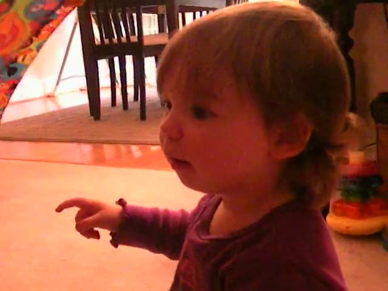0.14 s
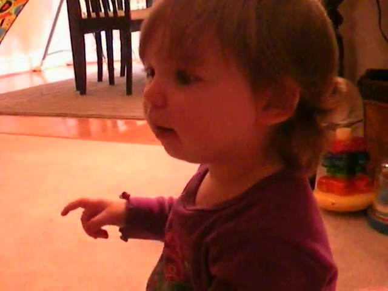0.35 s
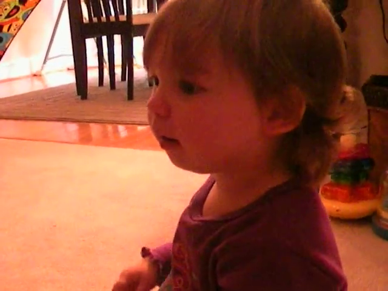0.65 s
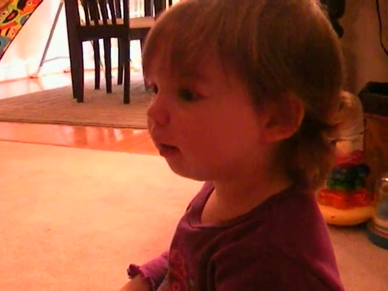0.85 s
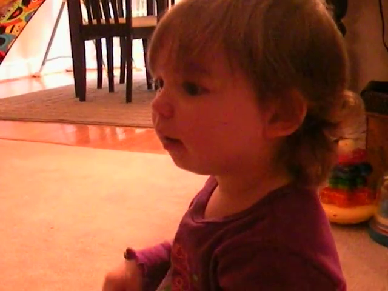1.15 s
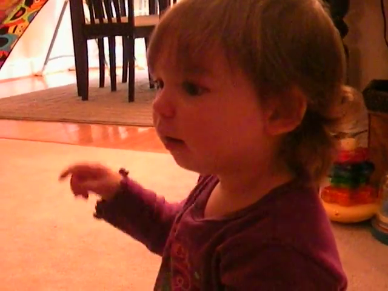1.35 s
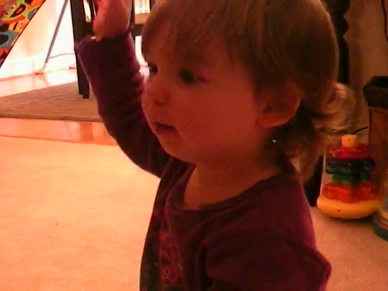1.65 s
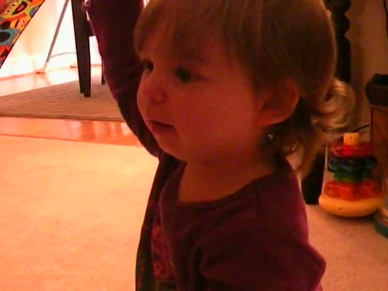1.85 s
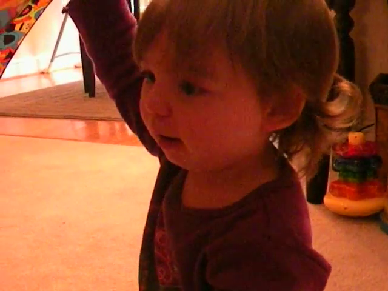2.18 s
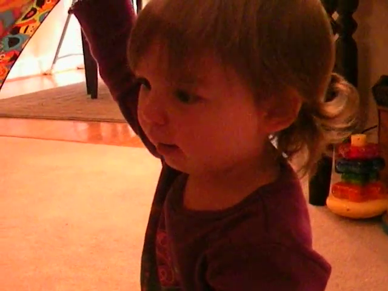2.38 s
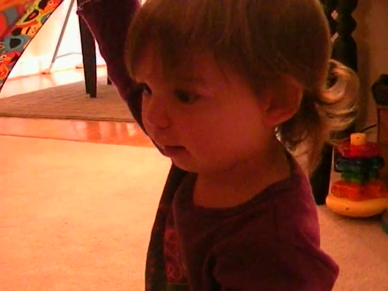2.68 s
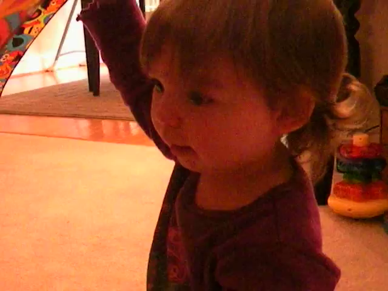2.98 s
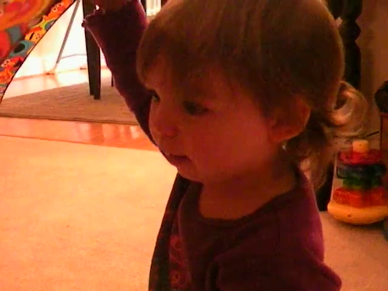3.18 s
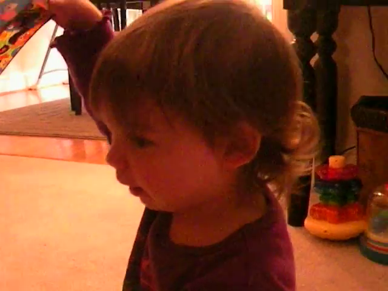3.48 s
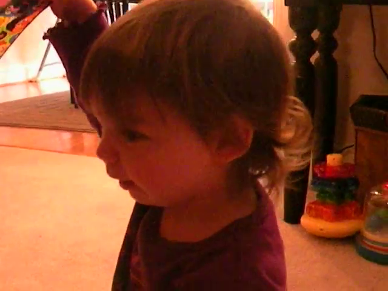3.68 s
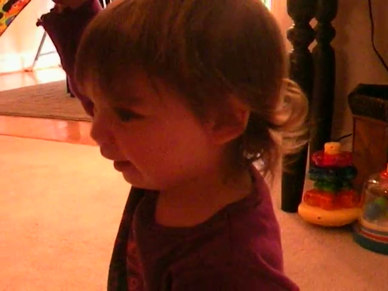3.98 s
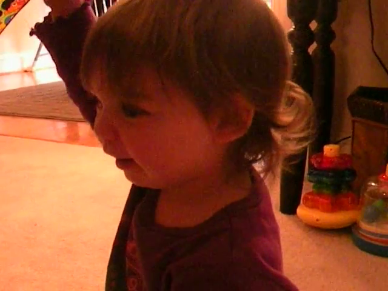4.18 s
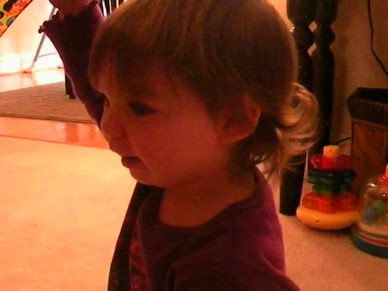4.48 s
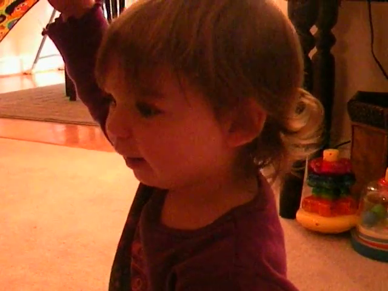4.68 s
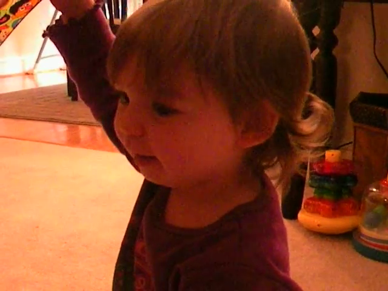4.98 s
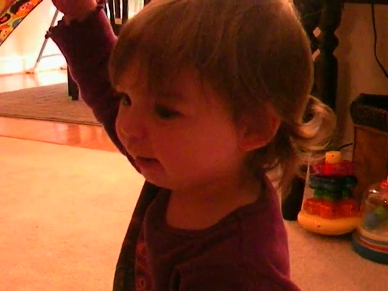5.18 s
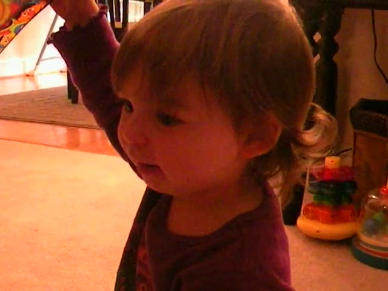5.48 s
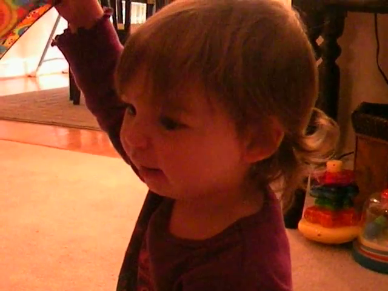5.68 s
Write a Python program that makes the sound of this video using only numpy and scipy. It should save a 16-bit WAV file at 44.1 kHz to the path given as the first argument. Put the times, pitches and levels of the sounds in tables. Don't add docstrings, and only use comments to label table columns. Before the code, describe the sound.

Quiet indoor hum and hiss, sparse fabric swipes and light carpeted taps, followed by continuous squeaky rubbing of synthetic cloth on the left.

```python
import sys
import numpy as np
from scipy import signal
from scipy.fft import rfft, irfft, next_fast_len
from scipy.io import wavfile
from scipy.ndimage import uniform_filter1d, map_coordinates

SR = 44100
rng = np.random.default_rng(int(sys.argv[2]) if len(sys.argv) > 2 else 0)


def rack_gain(trim_db):
    fader = np.asarray(trim_db, float)
    return 10 ** (fader / 20)


def unload_audio(sound):
    columns = np.transpose(np.atleast_2d(sound))
    steps = np.round(np.clip(columns, -1, 1) * 32767)
    wavfile.write(sys.argv[1], SR, steps.astype(np.int16))


N = 257544

# (frequency [Hz], density [dB/Hz])
HUM_SPECTRUM = [(13, -69), (22, -35), (38, -23), (53, -44), (57, -15), (68, -17.5), (118, -1), (130, -4.5),
                (145, -10.5), (247, -4.5), (328, -14.5), (345, -47), (420, -20), (550, -64), (920, -120)]
HISS_SPECTRUM = [(190, -21), (330, 0.5), (348, -6.5), (827, -2.5), (1080, -3.5), (1750, -3), (1970, -4),
                 (5330, -12), (7600, -21), (9880, -40), (16700, -120)]
FIZZ_SPECTRUM = [(8000, -120), (8200, -7.5), (9000, 0.5), (10000, 3), (11500, 2), (12700, 1.5),
                 (13800, -3.5), (14000, -120)]
# (frequency [Hz], correlation [-1..1])
HUM_LIKENESS = [(40, 0.5), (80, 0.92), (170, 0.11), (330, -0.85)]
# (frequency [Hz], t60 [s])
ROOM_T60 = [(200, 0.76), (2000, 0.37), (6000, 0.22), (12000, 0.058)]
# (frequency [Hz], density [dB/Hz])
AUDIBLE_FLOOR = [(6600, -140), (7000, -117), (7600, -114), (8400, -112), (9300, -112), (10500, -111),
                 (10800, -108.5), (12700, -108), (13000, -103)]

# (time [s], tick level [dB], tick cut-off [Hz], thud level [dB])
KNOCKS = [
    (2.034, -31, 5900, -36),
    (2.041, -26.5, 6850, -29),
    (2.048, -26, 3500, -57),
    (2.086, -60, 3000, -36),
    (3.374, -30, 3000, -41),
    (3.381, -21.5, 1500, -42),
    (3.406, -54, 1500, -39),
    (4.709, -42, 6000, -52),
]
# (frequency [Hz], level [dB], t60 [s])
BOARD_MODES = [(90, -9.5, 0.18), (165.3, -2, 0.35), (211, 2.5, 0.09), (271.5, -10.5, 0.19),
               (775, -4, 0.054)]
# (peak time [s], level [dB])
WEIGHT_SHIFTS = [
    (2.06, -38),
    (2.72, -47.5),
    (3.41, -47),
    (4.1, -45.5),
    (4.47, -46.5),
    (4.74, -40.5),
    (5.21, -46.5),
    (5.75, -45.5),
]
# (frequency [Hz], density [dB/Hz])
CREAK_SPECTRUM = [(90, -64), (140, 2), (200, -6.5), (260, 0), (320, -10.5), (350, -29), (500, -78)]

# (start [s], length [s], first pitch [Hz], last pitch [Hz], level [dB])
SQUEAKS = [(4.004, .04, 1760, 2090, -44.5), (4.034, 0.023, 1766, 1740, -44.5),
           (4.052, 0.019, 1636, 1380, -52), (4.1, 0.015, 2310, 5050, -27), (4.104, 0.0025, 3950, 4150, -16),
           (4.234, 0.041, 1824, 1976, -40.5), (4.275, 0.017, 1965, 1940, -45),
           (4.501, 0.025, 2035, 2290, -39), (4.505, 0.041, 1790, 1757, -39.5),
           (4.541, 0.04, 2260, 2090, -38.5), (4.721, 0.026, 2540, 2456, -29),
           (4.741, 0.07, 1420, 880, -47.5), (4.805, 0.02, 2370, 2420, -39.5),
           (5.069, 0.035, 1810, 2020, -36.5), (5.105, .0084, 2400, 2490, -43),
           (5.212, 0.011, 2310, 2410, -41), (5.304, 0.043, 1602, 897, -43), (5.337, 0.047, 1720, 2290, -41),
           (5.543, 0.058, 1167, 1800, -46.5), (5.576, .026, 1954, 1605, -38),
           (5.608, .026, 2030, 2320, -35.5), (5.63, .02, 2130, 1740, -42), (5.816, 0.026, 1994, 2350, -38),
           (5.818, 0.024, 1845, 1910, -36)]

# (fastest time [s], level [dB], speed-up [s], slow-down [s], palm contact [dB])
STROKES = [(4.02, -44, 0.039, 0.039, -2), (4.115, -44, 0.042, 0.046, 0), (4.24, -42.5, 0.053, 0.13, -8),
           (4.369, -38.5, 0.028, 0.028, -8), (4.485, -40.5, 0.037, 0.076, -5.5),
           (4.622, -41, 0.05, 0.045, -12), (4.765, -50, 0.042, 0.029, 1), (4.906, -41.5, 0.058, 0.031, -18),
           (5.02, -44.5, 0.019, 0.019, -1), (5.09, -44.5, 0.019, 0.038, -2), (5.162, -38, .04, 0.06, -17),
           (5.295, -39, .035, 0.029, -12), (5.435, -41.5, 0.099, 0.037, -8.5),
           (5.567, -38, .04, 0.067, -4.5), (5.71, -37, 0.046, 0.039, -10.5), (5.81, -37, 0.02, 0.045, -3.5)]
# (time [s], level [dB])
PRESSURE = [
    (3.9, -69),
    (4.082, -52),
    (4.714, -48.5),
    (4.732, -42.5),
    (4.85, -50.5),
    (5.31, -49),
    (5.802, -49.5),
    (5.84, -58),
]
# (time [s], drop [dB])
LIFTS = [
    (4.432, 0.5),
    (4.965, 8.5),
    (5.5, 3.5),
    (5.776, 2),
]
# (frequency [Hz], density [dB/Hz])
CLOTH_SPECTRUM = [(1880, -45), (3200, -3), (5810, -0.5), (6950, -5.5), (7400, -14.5), (9620, -13),
                  (16300, -120)]
PALM_SPECTRUM = [(1000, -19.5), (1600, -14), (2200, -6), (3000, -3), (4200, -15), (8000, -90)]
DULL_SPECTRUM = [(240, -26), (400, -18.5), (771, -7), (877, -3), (1470, -5.5), (1990, -3), (2200, -11),
                 (2860, -29), (4840, -120)]
POCKET_SPECTRUM = [(700, -53), (840, 1.5), (900, 10), (980, -8), (1150, -45)]
SHEEN_SPECTRUM = [(4820, -86), (8200, 1), (8680, -11), (9240, -3), (11000, -0.5), (13000, -4), (13800, -12)]

# (peak time [s], level [dB], fade [s], fold resonance [Hz])
SWIPES = [(.1, -58.5, 0.11, 2960), (1.131, -67, 0.075, 1800), (1.76, -64, 0.053, 1490),
          (2.063, -48, 0.021, 2960), (2.075, -28.5, 0.0029, 4900), (2.086, -24.5, 0.0094, 2820),
          (2.106, -34, 0.012, 2500), (2.365, -52.5, 0.032, 2120), (2.445, -39, 0.018, 4340),
          (2.626, -61, 0.02, 2000), (2.69, -41, 0.014, 870), (2.711, -23, 0.013, 4350),
          (2.78, -48, 0.034, 2470), (2.948, -55.5, 0.043, 2640), (3.141, -54, 0.04, 5630),
          (3.168, -40.5, 0.013, 6440), (3.23, -38.5, 0.013, 6440), (3.333, -50, 0.037, 2760),
          (3.43, -50, 0.03, 2480), (3.501, -56.5, 0.083, 2000), (3.598, -44, 0.0086, 4870),
          (3.611, -40.5, 0.023, 3950), (4.106, -33.5, 0.013, 4700), (4.728, -25, 0.0088, 2540),
          (4.759, -37.5, 0.013, 3500), (4.815, -52, .01, 2500), (5.208, -36, 0.014, 1900),
          (5.83, -42, 0.031, 2200)]
# (frequency [Hz], density [dB/Hz])
FABRIC_SPECTRUM = [(180, -49), (300, -19.5), (1000, -7), (1160, -3), (3730, -2.5), (4100, -6), (5020, 0.5),
                   (7400, -14.5), (9620, -51), (16300, -120)]


def unit(x):
    return x / np.sqrt(np.mean(x ** 2) + 1e-20)


def along(points, hz):
    f, v = np.transpose(points)
    return np.interp(np.log(hz + 1), np.log(f + 1), v)


def filtered(x, response):
    n = x.shape[-1]
    m = next_fast_len(n + 4096)
    return irfft(rfft(x, m) * response(np.fft.rfftfreq(m, 1 / SR)), m)[..., :n]


def wobble(rate_hz, size):
    knots = rng.standard_normal(int(size * rate_hz / SR) + 4)
    return map_coordinates(knots, [np.arange(size) * rate_hz / SR])


def rush(spectrum, alike, grain_db, size, lag_s=0.):
    pair = rng.standard_normal((2, size)) * rack_gain(grain_db * wobble(900, size))

    def mid_side(hz):
        turn = np.arccos(np.clip(along(alike, hz), -1, 1)) / 2
        return rack_gain(along(spectrum, hz)) * [np.cos(turn), np.sin(turn)]

    mid, side = filtered(pair, mid_side)
    left_right = np.array([mid + side, mid - side])
    return unit(filtered(left_right, lambda hz: np.exp(-2j * np.pi * hz * [[0], [lag_s]])))


def patchy(x, depth_db):
    z = signal.stft(x, nperseg=256)[2]
    field = uniform_filter1d(rng.standard_normal(z.shape[1:]), size=4, axis=0)
    field = uniform_filter1d(field, size=8, axis=1)
    return signal.istft(z * rack_gain(depth_db * unit(field)), nperseg=256)[1][:, :N]


def add(track, start_s, sound):
    part = track[..., max(round(start_s * SR), 0):][..., :sound.shape[-1]]
    part += sound[..., :part.shape[-1]]


def background():
    hum_db, hiss_db, fizz_db = -51 + 2.5, -57.5 + 5.0, -69.5
    swell_db = 0.8 * wobble(3, N)
    hum = rack_gain(hum_db + swell_db) * rush(HUM_SPECTRUM, HUM_LIKENESS, grain_db=0.5, size=N)
    drift_db = 0.3 * wobble(2.5, N)
    hiss = rush(HISS_SPECTRUM, [(500, -0.4), (4000, -0.54)], grain_db=-1.1, size=N)
    hiss = rack_gain(hiss_db + drift_db) * hiss
    fizz = rush(FIZZ_SPECTRUM, [(10000, -0.05)], grain_db=-2.5, size=N)
    return hum + hiss + rack_gain(fizz_db) * patchy(fizz, depth_db=3.5)


def room(x):
    out, step, predelay_s = np.zeros((2, N)), SR // 4, 0.008
    for start in range(0, N, step):
        hz, t, z = signal.stft(rng.standard_normal((2, SR // 2)), SR, nperseg=256)
        decay = rack_gain(-60 * t / along(ROOM_T60, hz)[:, None])
        tail = signal.istft(z * decay, SR, nperseg=256)[1]
        tail = tail / np.linalg.norm(tail[0])
        add(out, start / SR + predelay_s, signal.fftconvolve(x[None, start:start + step], tail, axes=1))
    return out


def weight_shifts():
    load_db_per_s, settle_db_per_s, standing_db = 264, 101, -57.5
    at_s, db = np.transpose(WEIGHT_SHIFTS)[:, :, None]
    since_s = np.arange(N) / SR - at_s
    slope = np.where(since_s < 0, -load_db_per_s, settle_db_per_s)
    shifting_db = (db - slope * since_s).max(0)
    weight_db = np.where(since_s[0] > 0, np.maximum(shifting_db, standing_db), shifting_db)
    return rack_gain(weight_db + 0.5) * rush(CREAK_SPECTRUM, [(200, 1.0)], grain_db=0, size=N)


def knocks():
    out, t = np.zeros(N), np.arange(SR // 2) / SR
    tick_t60_s, thud_rise_s = 0.016, 0.005
    for at_s, tick_db, tick_hz, thud_db in KNOCKS:
        crack = rng.standard_normal(len(t)) * rack_gain(-60 * t / tick_t60_s)
        tick = filtered(crack, lambda f: (1j * f / (600 + 1j * f)) ** 2 / (1 + 1j * f / tick_hz) ** 3)
        thud = np.zeros(len(t))
        for hz, db, t60_s in BOARD_MODES:
            thud += rack_gain(db + rng.normal(0, 1) - 60 * t / t60_s) * np.sin(2 * np.pi * hz * t)
        thud *= 1 - np.exp(-t / thud_rise_s)
        add(out, at_s, rack_gain(tick_db + 5) * tick + rack_gain(thud_db) * thud)
    return out


def squeaks():
    out = np.zeros(N)
    arch = 0.0573
    for start_s, length_s, first_hz, last_hz, db in SQUEAKS:
        u = np.linspace(-1.5, 1.5, round(1.5 * length_s * SR))
        hz = (last_hz - first_hz) * u / 2 + (last_hz + first_hz) / 2 * (1 + arch * (1 - u ** 2))
        hz = hz * (1 + 0.01 * wobble(200, len(u)))
        tone = rack_gain(1.3 * wobble(202, len(u))) * np.exp(-2.2 * u ** 2)
        halo = 0.3 * wobble(708, len(u)) * np.cos(np.pi * u / 3)
        whistle = (tone + halo) * np.sin(2 * np.pi * np.cumsum(hz) / SR)
        add(out, start_s - length_s / 4, rack_gain(db + 8.0) * whistle)
    return out


def rubbing():
    t = np.arange(N) / SR
    lift_s = 0.0097
    lift_db = sum(db * np.exp(-((t - at_s) / lift_s) ** 2) for at_s, db in LIFTS)
    pressure = rack_gain(np.interp(t, *np.transpose(PRESSURE), left=-120) - lift_db)
    at_s, db, up_s, down_s, palm_db = np.transpose(STROKES)[:, :, None]
    strokes = rack_gain(db) * np.exp(-((t - at_s) / np.where(t < at_s, up_s, down_s)) ** 2)
    drag = rack_gain(2.5) * pressure
    speed = np.sqrt((strokes ** 2).sum(0) + drag ** 2)
    contact = np.sqrt(((rack_gain(palm_db) * strokes) ** 2).sum(0) + (0.64 * drag) ** 2)

    faster_db = np.clip(20 * np.log10(speed) + 42, -20, 20)
    shade_db = np.array([[0.3], [-0.7]]) * (9 + 0.16 * faster_db)

    cloth = speed * rack_gain(2.0 + shade_db)
    cloth = cloth * rush(CLOTH_SPECTRUM, [(4000, 0.05)], grain_db=0.5, size=N, lag_s=7e-5)
    palm = contact * rack_gain(4.0 + 0.13 * shade_db)
    palm = palm * rush(PALM_SPECTRUM, [(2000, 0.53)], grain_db=0.5, size=N, lag_s=7e-5)
    dull = pressure * rack_gain(2.0 + 0.067 * faster_db + 0.12 * shade_db)
    dull = dull * rush(DULL_SPECTRUM, [(500, 0.6), (1400, 1.0)], grain_db=0.0, size=N, lag_s=6e-5)
    sheen = speed * rack_gain(3.5 - 0.033 * faster_db + 0.99 * shade_db)
    sheen = sheen * rush(SHEEN_SPECTRUM, [(10000, -0.53), (12000, -0.8)], grain_db=1.0, size=N)
    pocket = pressure * rack_gain(-10 + 1.8 * wobble(6, N))
    pocket = pocket * rush(POCKET_SPECTRUM, [(900, 0.9)], grain_db=0.5, size=N)
    grip_db = 0.7 * wobble(40, N)
    return rack_gain(grip_db) * (patchy(cloth + palm + dull, depth_db=2.0) + sheen + pocket)


def swipes():
    out, t = np.zeros((2, N)), np.arange(SR // 3) / SR
    swell_over_fade = 1.06
    for at_s, db, fade_s, fold_hz in SWIPES:
        far = db < -62
        lead_s = min(at_s, 0.13)
        off_s = np.abs(t - lead_s)
        swell = (off_s / (swell_over_fade * fade_s)) ** 1.33
        fade = np.where(t < lead_s, swell, (off_s / fade_s) ** 1.12)
        sheen_db = -2 + 1.5 * np.log2(fold_hz / 3000) - 14 * far
        delays_s = rng.uniform(0.000542, 0.006, (5, 1))
        broad = 0.57 * (0.2 if far else 1)

        def fold(f):
            comb = 1 + 0.62 * np.exp(-2j * np.pi * f * delays_s).sum(0)
            resonance = 0.91 / np.sqrt(1 + ((f - fold_hz) / (0.102 * fold_hz)) ** 2)
            return (broad + resonance) * comb

        body = rush(FABRIC_SPECTRUM, [(1500, 1.0), (5000, 0.87)], grain_db=4.5, size=len(t))
        body = rack_gain(db - 6.43 * fade) * unit(filtered(body, fold))
        sheen = rush(SHEEN_SPECTRUM, [(10000, 0.61)], grain_db=1.5, size=len(t))
        sheen = rack_gain(db + sheen_db - 10.7 * fade ** 0.63) * sheen
        add(out, at_s - lead_s, body + sheen)
    return out


def scene():
    whistle = squeaks()
    ahead = swipes() + knocks() + weight_shifts()
    wet = rack_gain(-12) * room(ahead.mean(0) + rack_gain(-6) * whistle)
    left_whistle = np.array([whistle * rack_gain(-1.0), np.roll(whistle, 2) * rack_gain(-2.0)])
    return ahead + left_whistle + wet + rubbing() + background()


def band_limit(x):
    return signal.sosfilt(signal.butter(12, 14340, fs=SR, output="sos"), x)


def record(dry):
    gap_hz, gap_width_hz, top_hz = 7950, 420, 13830
    gap = lambda hz: (1 - np.exp(-((hz - gap_hz) / gap_width_hz) ** 4)) * (hz < top_hz)
    hz, _, z = signal.stft(filtered(dry, gap), SR, nperseg=2048, scaling="psd")
    power = uniform_filter1d(np.mean(np.abs(z) ** 2, 0), size=9, axis=0)
    power = uniform_filter1d(power, size=2, axis=1)
    kept = power > rack_gain(along(AUDIBLE_FLOOR, hz)[:, None]) ** 2
    mix = signal.istft(z * kept, SR, nperseg=2048, scaling="psd")[1][:, :N]
    return band_limit(mix)


dry = scene()
out = record(dry)
unload_audio(out)
```